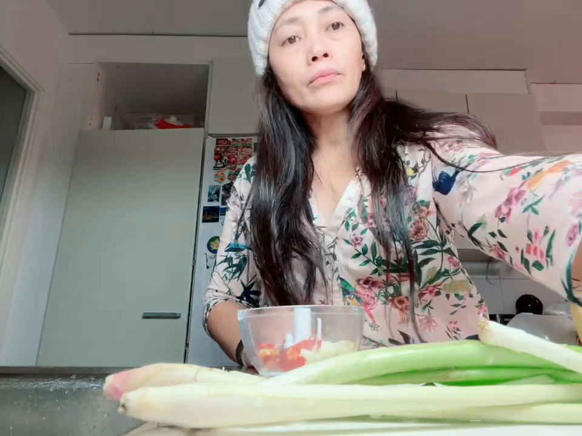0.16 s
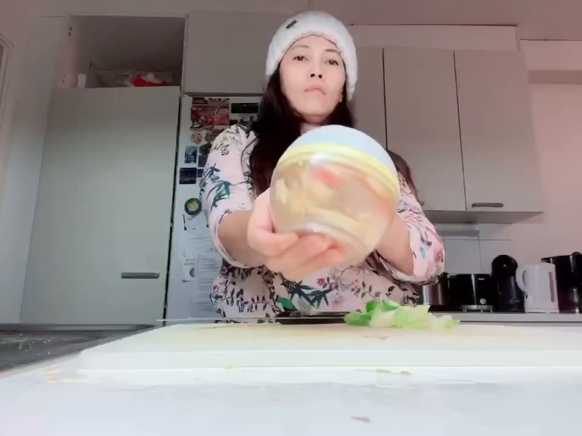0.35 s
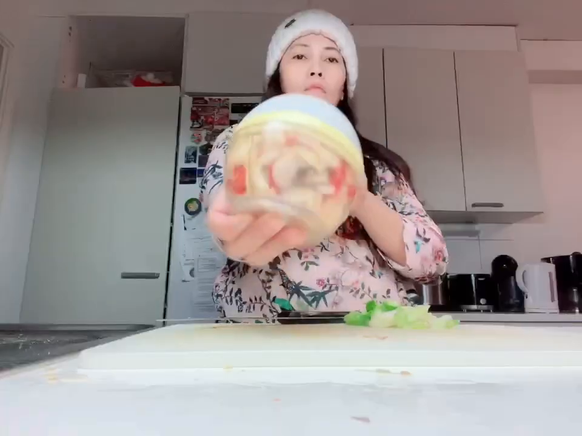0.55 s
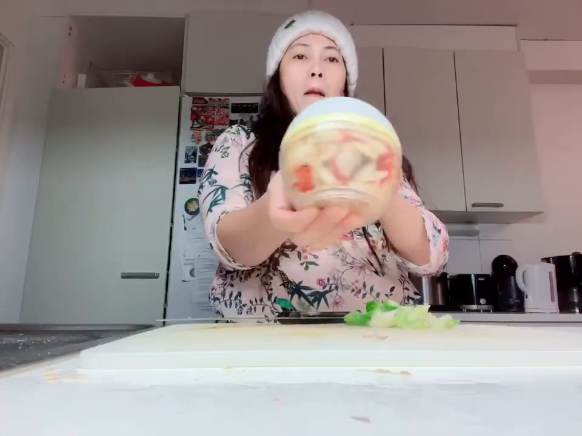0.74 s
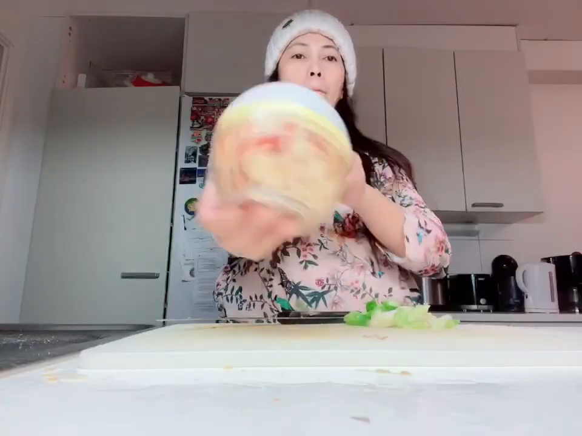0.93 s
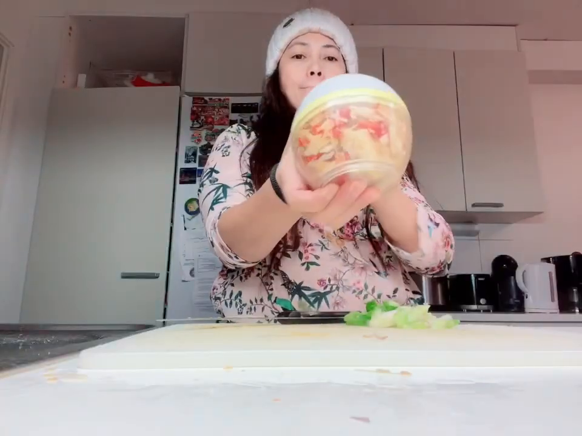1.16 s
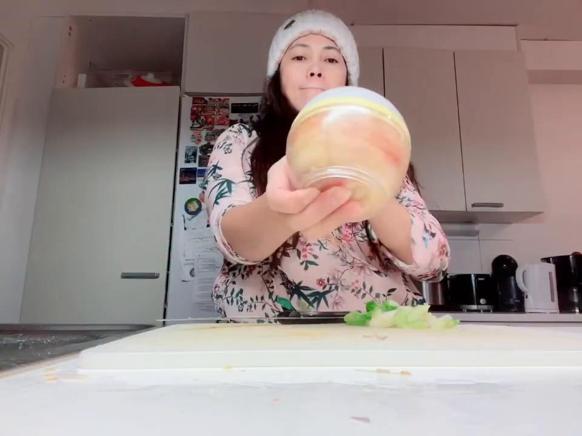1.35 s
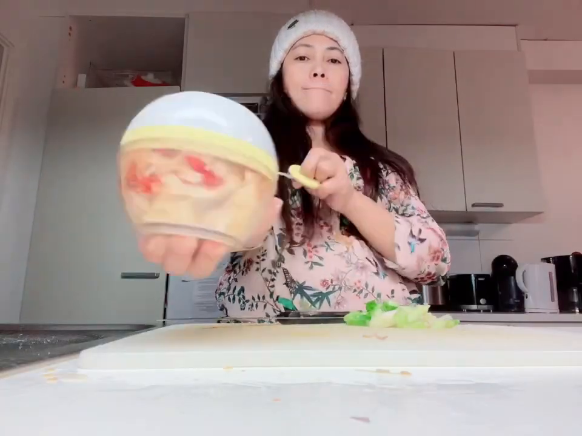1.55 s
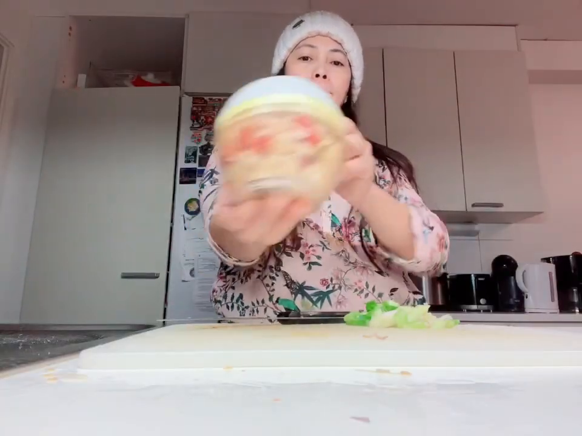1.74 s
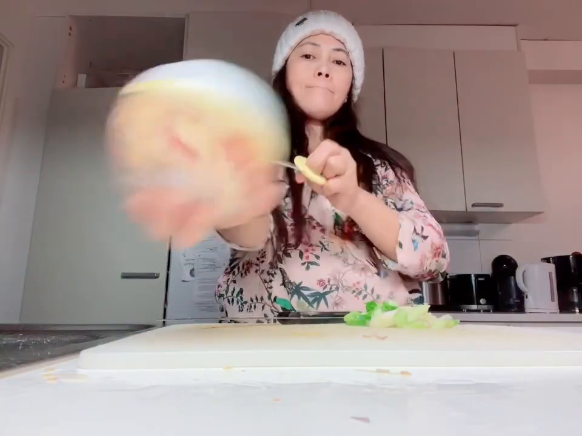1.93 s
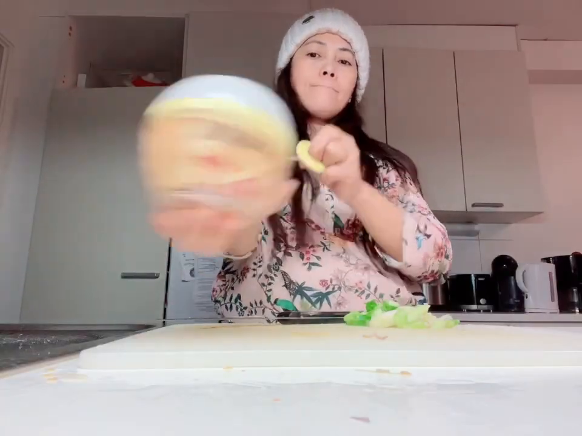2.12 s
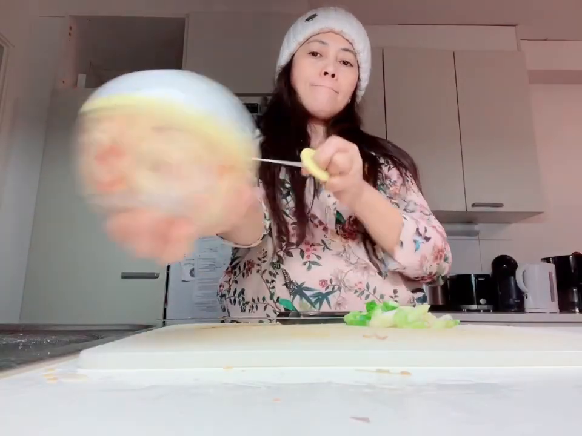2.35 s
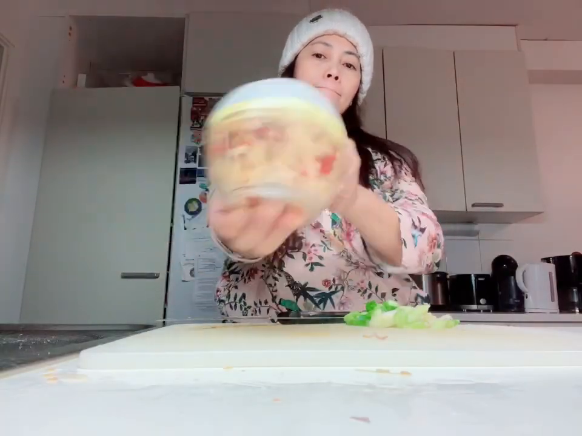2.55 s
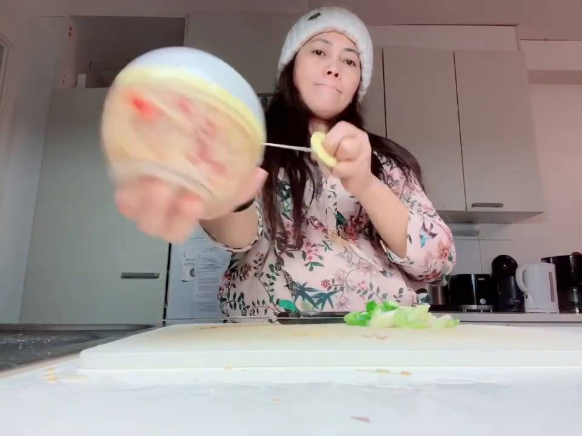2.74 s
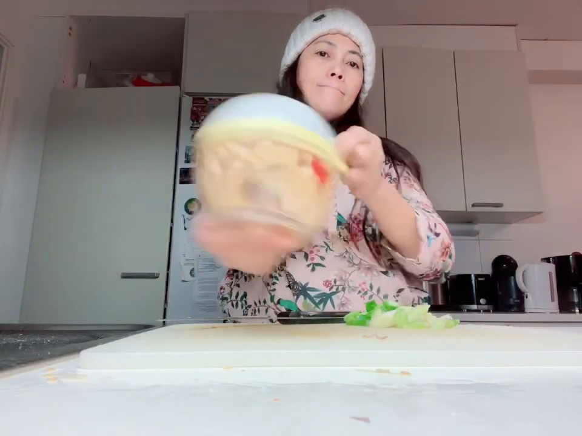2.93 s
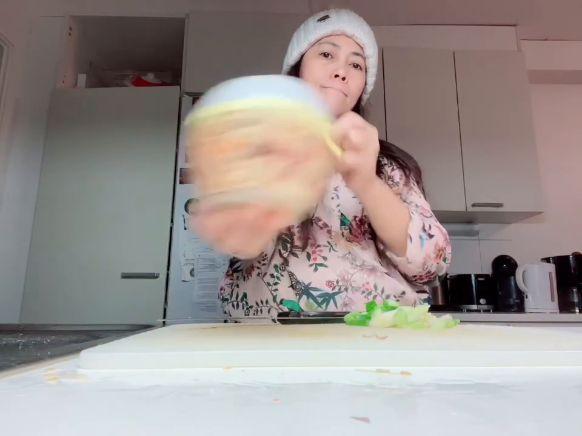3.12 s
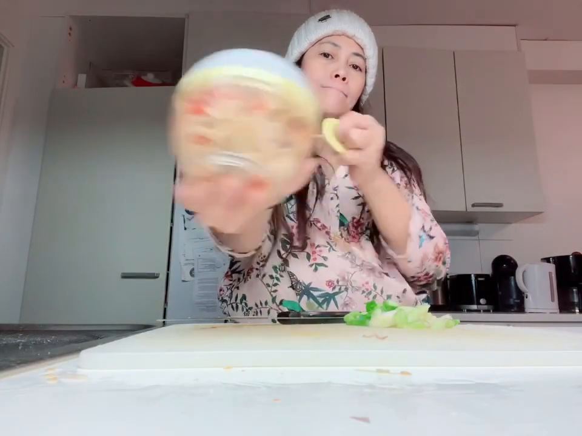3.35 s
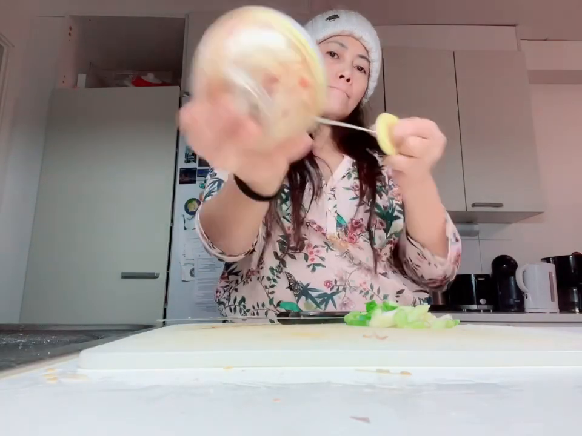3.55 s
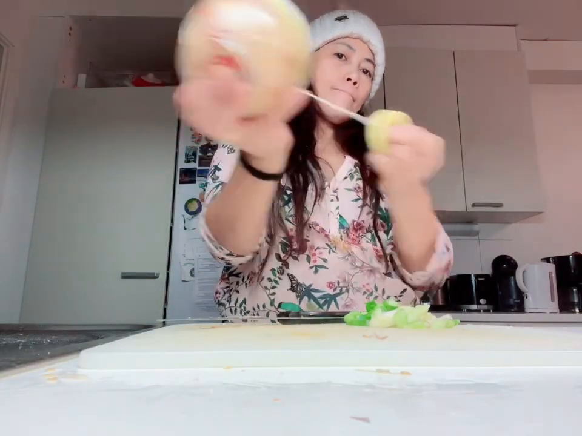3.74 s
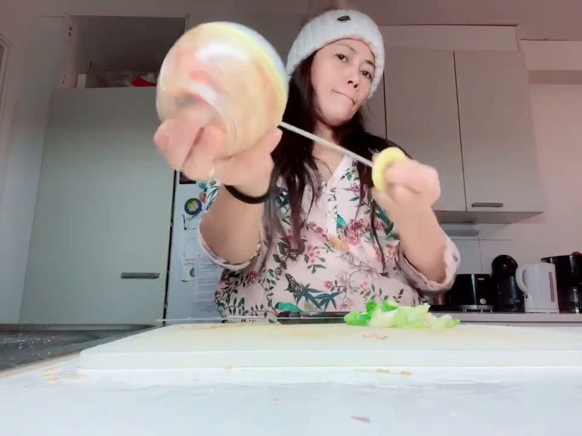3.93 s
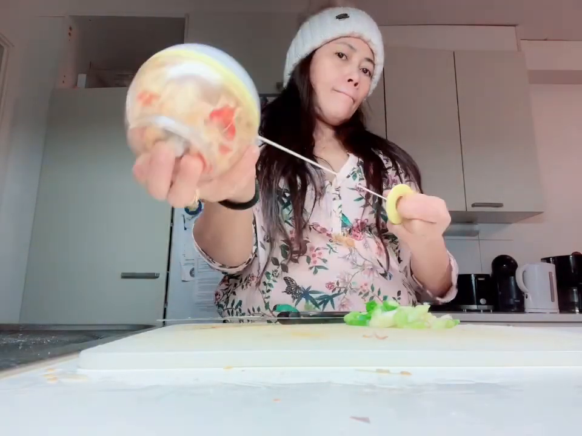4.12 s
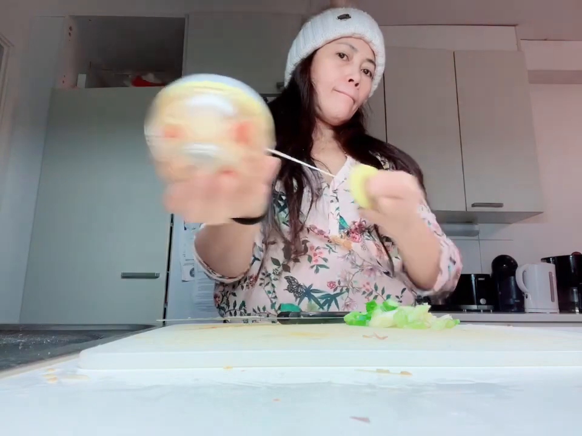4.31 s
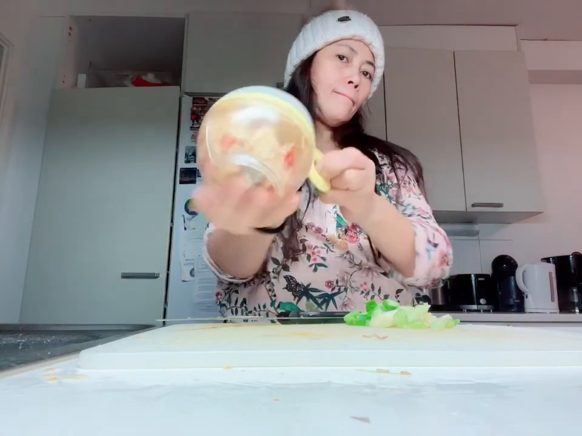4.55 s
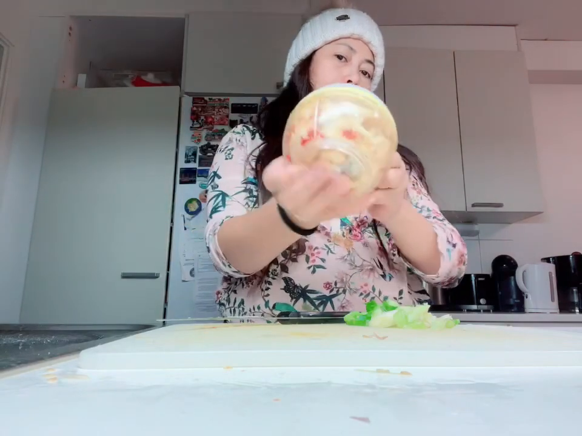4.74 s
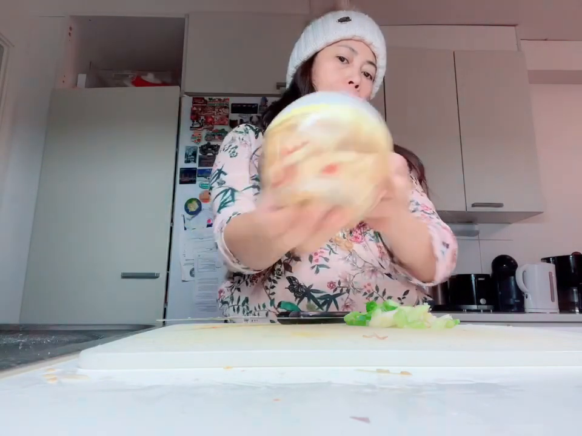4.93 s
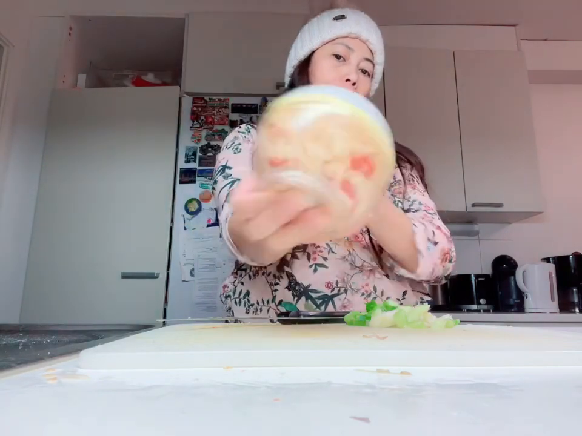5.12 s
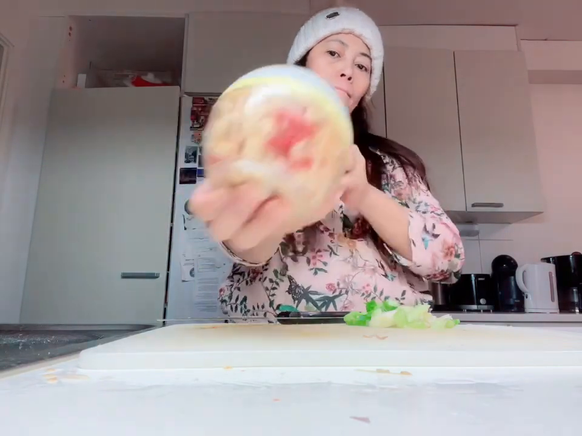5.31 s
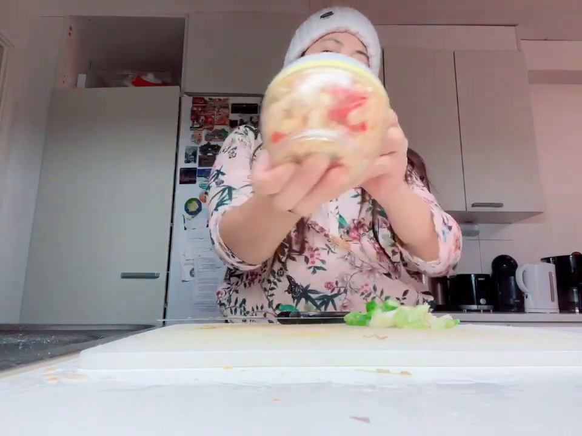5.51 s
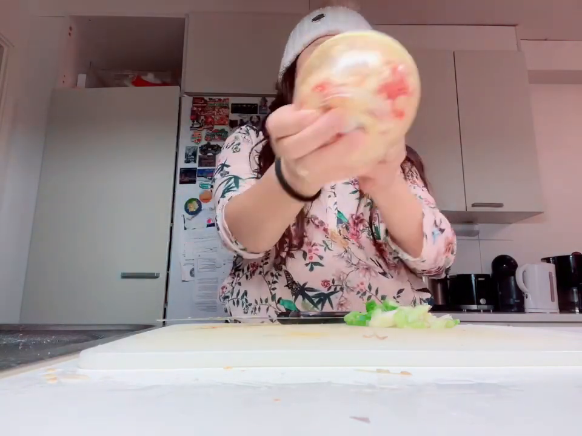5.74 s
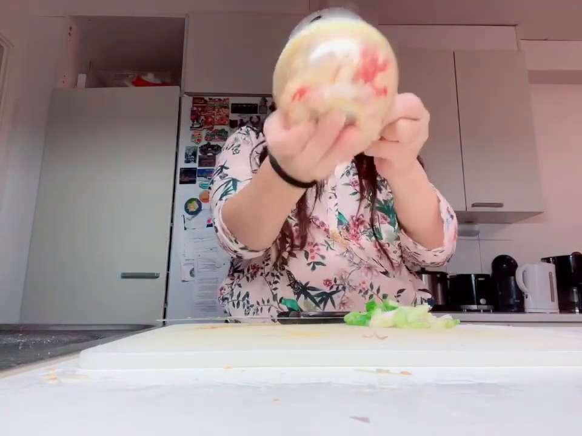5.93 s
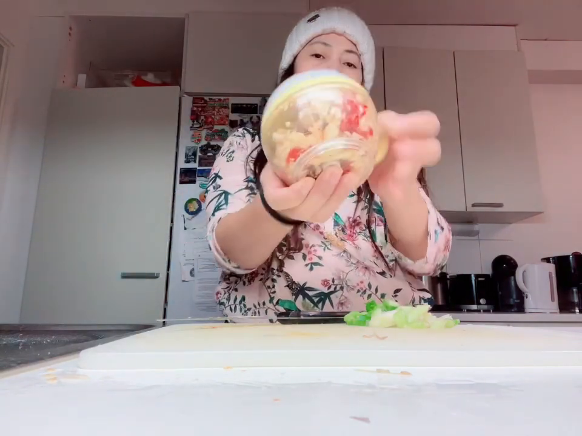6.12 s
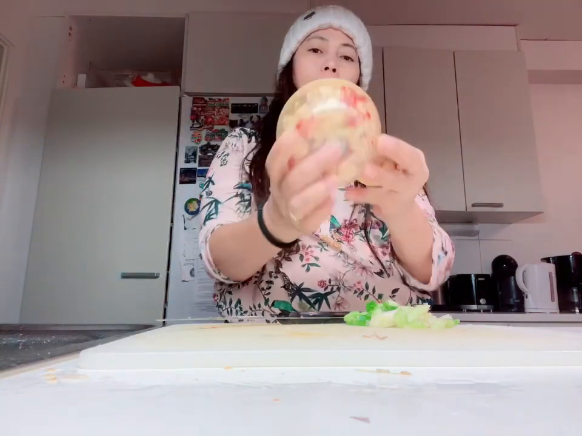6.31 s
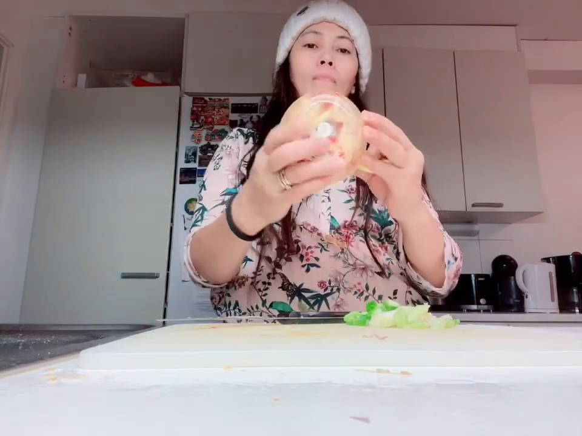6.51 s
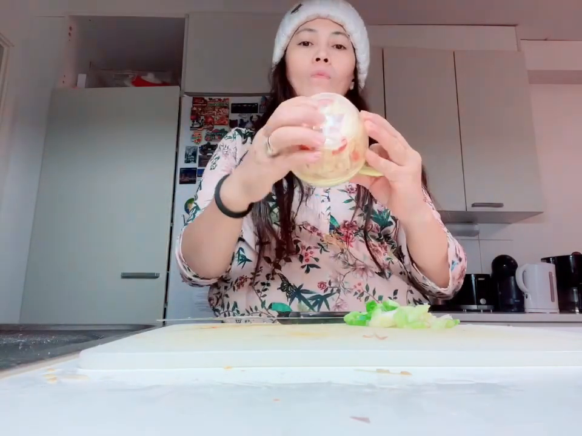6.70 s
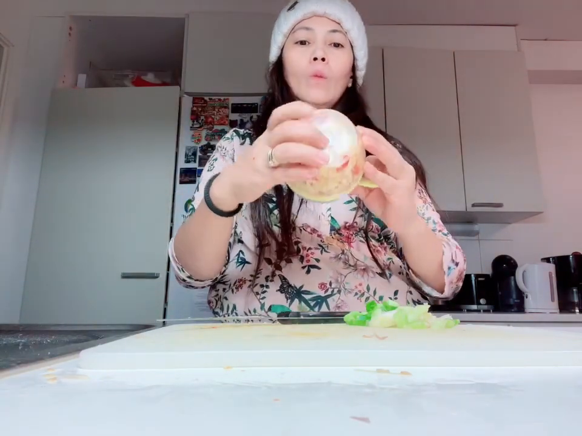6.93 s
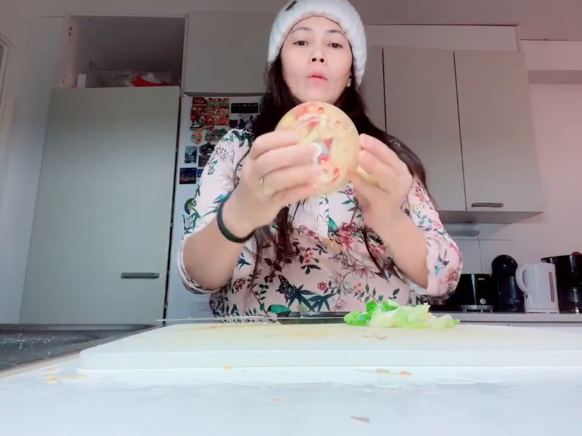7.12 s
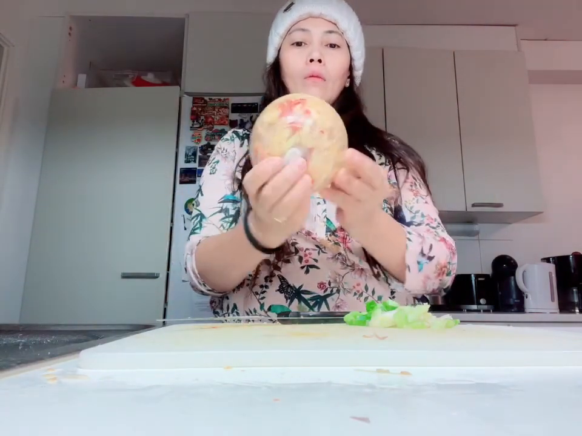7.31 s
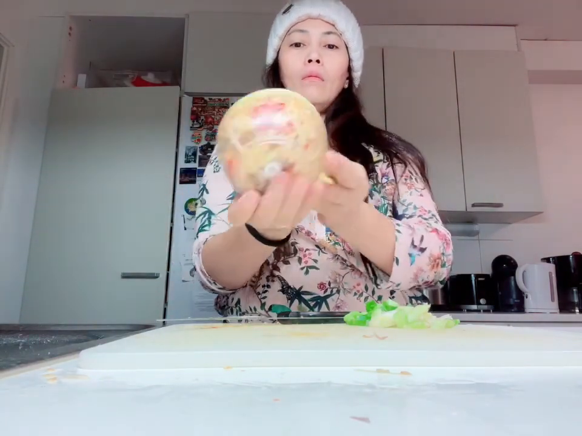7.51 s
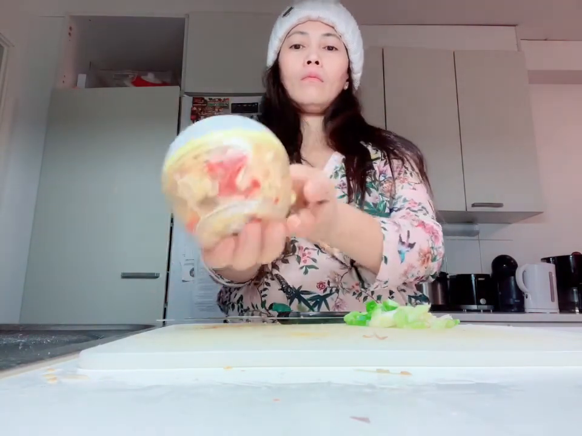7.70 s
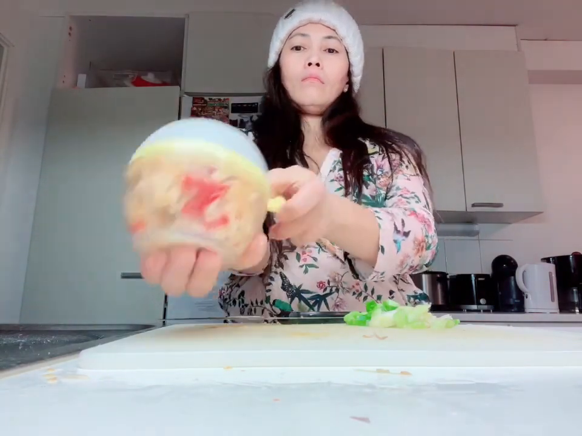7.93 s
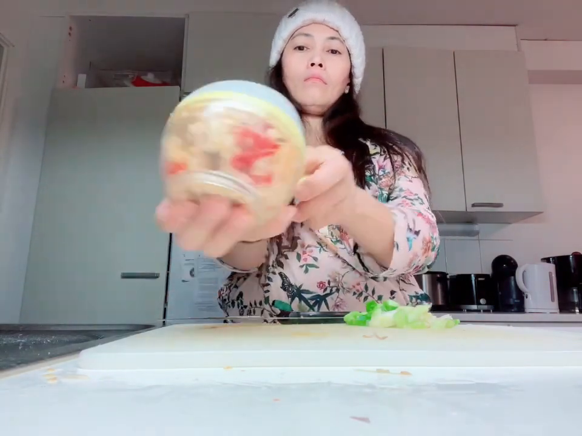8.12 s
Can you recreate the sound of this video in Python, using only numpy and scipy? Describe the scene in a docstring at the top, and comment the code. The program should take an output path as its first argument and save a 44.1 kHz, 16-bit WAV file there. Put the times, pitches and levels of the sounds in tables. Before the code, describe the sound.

A hand-pull food chopper clacks and rattles in quick repeated strokes, its cord zipping back each time, then slows to scattered hollow knocks.

```python
"""Kitchen counter: a hand-pull food chopper works close to a phone that has just been set down.
Each stroke: a clack as the drive catches, a rattling churn of blades and garlic in the plastic bowl,
then the zip and squeal of the cord as the spring reels it in. A few slow, knocking turns follow.
Behind it: dull bumps, finger rub, puffs of air on the microphone, room air and an appliance hum."""
import sys
import numpy as np
from scipy import signal
from scipy.fft import rfft, irfft
from scipy.io import wavfile
from scipy.ndimage import uniform_filter1d, map_coordinates

SR = 44100
rng = np.random.default_rng(int(sys.argv[2]) if len(sys.argv) > 2 else 0)


def to_wav(s):
    """Save 16-bit WAV."""
    ch = np.atleast_2d(s).T  # columns
    pcm = np.round(np.clip(ch, -1, 1) * 32767)  # PCM
    wavfile.write(sys.argv[1], SR, pcm.astype(np.int16))


N = 359856
TIME_S = np.arange(N) / SR

# appliance hum and whine: pitch_hz, level_db
HUM_TONES = [(50, -70), (100, -53), (118, -67.5), (165, -67.5), (232, -70.5), (2298, -82), (2573, -74),
             (2622, -77.5), (2966, -76)]
# start_s, swell_s, fade_s, level_db
AIR_PUFFS = [(0.0, .08, .2, -50), (5.495, 0.025, .2, -39), (5.83, .05, 0.45, -48), (7.14, 0.064, .1, -51)]
FINGER_RUBS = [(0.0, 0.15, 0.047, -50), (0.228, 0.068, 0.046, -26), (4.645, 0.019, 0.26, -35),
               (5.622, 0.0091, 0.039, -35), (5.692, 0.048, 0.19, -38), (5.98, 0.041, .33, -47.5),
               (7.97, 0.092, .04, -40)]
# blows: start_s, peak_db, treble_db, pitch_hz
BUMP_HITS = [(0.249, -26.5, -2, 294), (0.286, -11.5, 4, 797), (0.326, -12, 11, 886),
             (3.197, -21.5, -1, 284), (5.546, -30, 0, 250), (5.75, -23.5, -18, 255), (5.766, -21.5, 6, 290),
             (6.56, -41.5, -10, 180)]   # phone on counter, bowl in hand
DRIVE_CLACKS = [(0.6995, -21, 1, 883), (1.165, -24.5, 2.5, 940), (1.707, -15.5, -7.5, 2280),
                (2.128, -14.5, -3, 950), (2.478, -15, -2.5, 906), (2.792, -9.5, 2, 940.5),
                (3.081, -12.5, -7, 2160), (3.377, -8.5, -6, 2136), (4.437, -11.5, -4, 1652),
                (4.878, -14, -9.5, 858), (5.484, -25, 1, 2220), (5.491, -15.5, -11.5, 880)]   # hard plastic handle and drive
BOWL_KNOCKS = [(0.502, -40.5, 7, 493), (0.78, -27, -4, 600), (0.804, -14, 9, 830), (0.849, -30, 15, 677),
               (0.907, -28.5, -15, 530), (0.967, -39.5, -1, 695), (1.224, -25.5, 0, 710),
               (1.281, -41, 6, 759), (1.331, -20, 11, 720), (1.374, -12, 10, 538), (1.763, -22.5, 0, 780),
               (1.849, -13.5, -5, 546), (2.217, -10.5, 0, 490), (2.269, -12, 6, 718),
               (2.333, -25.5, -3, 696), (2.516, -15, 8, 857), (2.822, -15.5, 18, 640), (2.845, -9, 6, 668),
               (3.11, -18, -4, 769), (3.494, -19.5, -10, 830), (3.862, -17.5, -10, 800),
               (4.074, -40, 10, 700), (4.137, -40.5, 5, 735), (4.537, -33, -10, 830),
               (4.657, -31.5, -9, 464), (4.743, -34, 7, 810), (4.761, -31.5, 6, 493), (4.95, -24.5, 8, 664),
               (4.985, -25, 12, 750), (5.053, -11, 3, 820), (5.071, -9, -11, 630), (5.089, -7.5, 18, 870),
               (5.261, -28.5, -6, 670), (5.629, -38, 0, 830), (5.695, -34.5, 2, 626),
               (5.748, -24.5, -17, 770), (5.877, -36.5, 6, 530), (6.284, -34.5, -21, 795),
               (7.377, -35.5, 6.5, 787), (7.6, -44, -7.5, 804), (7.704, -33.5, 4, 790),
               (7.752, -26.5, 2, 810), (7.774, -33, 7, 760), (7.794, -29.5, -6, 716),
               (7.818, -34.5, -9, 740), (7.841, -28.5, -8, 795), (7.878, -27.5, -15, 614),
               (7.962, -24, 3.5, 752), (8.003, -39, 16, 507), (8.038, -33.5, -9, 705),
               (8.072, -26.5, -14, 520), (8.142, -31.5, 24, 840)]   # blades and pieces on the bowl
# cord running onto the reel: start_s, run_up_s, run_down_s, scrape_db, squeal_db
CORD_REWINDS = [(0.546, .04, 0.12, -32, -40), (0.999, 0.049, 0.1, -30.5, -37.5),
                (1.52, 0.078, 0.12, -23.5, -24.5), (1.979, 0.054, 0.12, -22, -33),
                (2.35, 0.053, 0.094, -20.5, -22.5), (2.671, 0.067, 0.061, -20, -21.5),
                (2.974, 0.051, 0.056, -15.5, -19), (3.271, .042, 0.058, -20, -23.5),
                (3.61, 0.0037, 0.026, -41, -48), (3.63, .05, 0.096, -22.5, -27),
                (4.168, 0.0055, 0.035, -46, -44), (4.2, 0.084, 0.15, -26, -29),
                (4.745, 0.074, 0.032, -44, -41.5), (5.311, 0.0275, 0.15, -24.5, -28),
                (5.835, .003, .035, -52.5, -61), (6.389, 0.0028, 0.041, -47.5, -55),
                (7.022, .003, 0.026, -49.5, -51)]
# cord pulls: start_s, run_up_s, hold_s, chop_db, thud_db, spray_db
CORD_PULLS = [(0.337, 0.043, 0.042, -35.5, -42.5, -46), (0.721, 0.058, 0.026, -24, -31.5, -36.5),
              (1.187, 0.18, 0.045, -18.5, -27.5, -33.5), (1.723, 0.055, 0.074, -18, -30, -31.5),
              (2.118, 0.055, .085, -20, -27.5, -30.5), (2.481, 0.036, .07, -20.5, -34.5, -32.5),
              (2.796, .03, 0.064, -17.5, -29, -29.5), (3.089, 0.028, 0.031, -15.5, -25.5, -32.5),
              (3.379, 0.014, .115, -26.5, -36, -34.5), (3.783, 0.024, 0.082, -25.5, -36, -36.5),
              (3.915, 0.032, 0.018, -26.5, -29.5, -33), (4.445, .008, 0.018, -32.5, -34, -41.5),
              (4.882, 0.007, 0.013, -32, -40.5, -37.5), (4.956, 0.12, 0.02, -19.5, -26, -29.5),
              (5.492, 0.029, .02, -38, -40.5, -42)]
# resonances: freq_hz, width_hz, level_db
BOWL_MODES = [(470, 200, -9), (700, 170, -3), (860, 150, -1), (1650, 160, -11), (2050, 130, -3),
              (2510, 180, -9), (3030, 200, -12), (3480, 160, -13), (4150, 260, -16)]
REEL_MODES = [(867, 140, -8), (2120, 260, -4), (2520, 160, -12), (5390, 280, -2), (6070, 250, -13),
              (8270, 280, -1), (8900, 600, -8), (9700, 250, -8), (11500, 400, -13)]
# broad colours as heard: freq_hz, density_db
AIR_SPECTRUM = [(25, -29.5), (50, -10.5), (80, -4), (150, -21), (300, -13), (600, -19), (840, -18.5),
                (1000, -24.5), (1900, -29.5), (2500, -26.5), (3800, -35), (6200, -36), (16000, -47.5)]
PUFF_SPECTRUM = [(20, -13), (50, 4), (90, -13), (200, -30), (600, -68)]
FINGER_SPECTRUM = [(24, -51), (40, -17), (85, 3), (307, 8), (559, -4.5), (780, 0.5), (1240, -11.5),
                   (2420, -19.5), (4500, -38), (8000, -34), (10400, -56.5), (17600, -120)]
BUMP_SPECTRUM = [(29, -49), (50, -22), (97, 7), (154, -7.5), (238, 8.5), (637, -0.5), (784, -1.5),
                 (1160, -20.5), (1360, -11.5), (2010, -40), (7250, -42.5), (12000, -55), (15600, -94),
                 (22000, -120)]
CLACK_SPECTRUM = [(100, -36.5), (350, 1.5), (750, 6), (1200, -1), (2300, 3.5), (4000, -7.5), (8500, -3.5),
                  (12000, -13.5), (16000, -19)]
KNOCK_SPECTRUM = [(80, -38), (250, 8), (750, 7), (1150, 0.5), (2300, 1.5), (4500, -12.5), (9000, -16.5),
                  (16000, -39)]
CHOP_SPECTRUM = [(150, -11.5), (350, 1.5), (600, 0.5), (900, 4.5), (1100, -3.5), (1800, -3.5), (2300, -2.5),
                 (4000, -14.5), (7000, -14.5), (16000, -28)]
THUD_SPECTRUM = [(25, -25), (55, -1.5), (110, -12.5), (170, -3), (270, 8.5), (450, -2), (800, -18.5),
                 (2000, -42.5)]
SPRAY_SPECTRUM = [(1000, -11), (3000, -3.5), (5000, -3), (7000, 1), (9000, 1.5), (11000, -6), (16000, -6.5)]
# cord's scraping hiss as heard, with audio-coder dips near 10.4 and 13.7 kHz: freq_hz, density_db
HEARD_SCRAPE_SPECTRUM = [(80, -34), (250, 5), (700, 1.5), (1300, -11), (2600, 2.5), (4300, -6), (7700, 2.5),
                         (9800, 1), (10400, -11), (12500, -9.5), (13700, -30.5), (16000, -31.5)]
# microphone notches: freq_hz, width_hz, gain_db
MIC_NOTCHES = [(1005, 66, -7.5), (1790, 43, -10)]

# levels at the ends of a move, relative to its top
RUB_START_DB, RUB_STOP_DB = -6, -17.5
REEL_START_DB, REEL_STOP_DB = -9.5, -18.5


def from_db(db):
    """Decibels to gain."""
    return 10 ** (np.asarray(db) / 20)


def unit_rms(x):
    """Scale to unit rms."""
    return x / np.sqrt(np.mean(x ** 2) + 1e-20)


def drift(rate_hz):
    """Smooth random wander, unit rms."""
    pole = np.exp(-2 * np.pi * rate_hz / SR)
    return unit_rms(signal.lfilter([1], [1, -2 * pole, pole * pole], rng.standard_normal(N + SR))[SR:])


def gate(t, fade_s=0.0078):
    """Ramp that opens as t passes zero."""
    return np.clip(t / fade_s, 0, 1)


def swells(rows, start_db, stop_db, curve, fade_s):
    """Each move rises to its top and sinks; one gain curve per level column."""
    out = np.zeros((len(rows[0]) - 3, N))
    for start_s, up_s, down_s, *levels_db in rows:
        length_s = up_s + down_s + fade_s
        span = slice(*np.searchsorted(TIME_S, [start_s, start_s + length_s]))
        t = TIME_S[span] - start_s
        rise_db = start_db * np.clip(1 - t / up_s, 0, 1) ** curve
        fall_db = stop_db * np.clip((t - up_s) / down_s, 0, 1) ** curve
        envelope = from_db(rise_db + fall_db) * gate(t) * gate(length_s - t, fade_s)
        out[:, span] += np.outer(from_db(levels_db), envelope)
    return out


def response(spectrum, modes=(), modes_db=0, size=4096):
    """Impulse response: minimum-phase spectrum plus ringing modes, unit energy."""
    hz, db = np.transpose(spectrum)
    bins_hz = np.maximum(np.fft.rfftfreq(size, 1 / SR), 1)
    magnitude = from_db(np.interp(np.log(bins_hz), np.log(hz), db))
    cepstrum = irfft(np.log(magnitude))
    cepstrum[1:size // 2] *= 2
    out = irfft(np.exp(rfft(cepstrum[:size // 2], size)))
    t = TIME_S[:size]
    for mode_hz, width_hz, level_db in modes:
        gain = from_db(level_db + modes_db) * 2 * np.pi * width_hz / SR
        out += gain * np.exp(-np.pi * width_hz * t) * np.cos(2 * np.pi * mode_hz * t)
    return out / np.linalg.norm(out)


def excite(force, body):
    """Drive a body with a force."""
    return signal.oaconvolve(force, body)[:N]


def contacts(per_s, spread_db, contact_s, rub):
    """Tiny random impacts of uneven size over steady rubbing, evened to unit level."""
    onsets = rng.random(N) < per_s / SR
    energies = onsets * from_db(spread_db * np.minimum(rng.exponential(1, N), 3)) ** 2
    power = signal.lfilter([1], [1, -np.exp(-1 / (contact_s * SR))], energies + 1e-18)
    power = power / power.mean() + rub
    return rng.standard_normal(N) * np.sqrt(power / uniform_filter1d(power, size=1500))


def plop(start_hz, ring_s, sag, sag_s=.014, size=4096):
    """Short ring, falling in pitch as the struck wall gives way; unit energy."""
    t = TIME_S[:size]
    pitch_hz = start_hz * np.exp(-sag * (1 - np.exp(-t / sag_s)))
    ring = np.sin(2 * np.pi * np.cumsum(pitch_hz) / SR) * np.exp(-t / ring_s)
    return ring / np.linalg.norm(ring)


def blows(rows, spectrum, modes=(), modes_db=0, *, rise_s, contact_s, chatter_db, chatter_s,
          plop_db, ring_s, sag, treble_hz=3000, size=4096):
    """Contact burst, dying chatter and a plop; mode strengths vary with where each blow lands."""
    out, t = np.zeros(N + SR), TIME_S[:size]
    attack = 1 - np.exp(-(t / rise_s) ** 2)
    decay = np.exp(-t / contact_s) + from_db(chatter_db) * np.exp(-t / chatter_s)
    for start_s, peak_db, treble_db, pitch_hz in rows:
        struck_modes = [(hz, width_hz, db + rng.normal(0, 4)) for hz, width_hz, db in modes]
        force = rng.standard_normal(size) * attack * decay
        hit = signal.fftconvolve(force, response(spectrum, struck_modes, modes_db))[:size]
        low = signal.sosfilt(signal.butter(1, treble_hz, fs=SR, output="sos"), hit)
        hit = low + (hit - low) * from_db(treble_db)
        note = np.r_[np.zeros(int(rise_s * SR)), plop(pitch_hz, ring_s, sag)][:size]
        hit = hit / np.linalg.norm(hit) + from_db(plop_db) * note
        peak_rms = np.sqrt(uniform_filter1d(hit ** 2, size=128).max())
        at = round(start_s * SR)
        out[at:at + size] += hit * from_db(peak_db) / peak_rms
    return out[:N]


def background(waver_db=1.2, air_db=-57.5):
    """Wavering appliance hum and room air."""
    hum = sum(from_db(db) * np.sqrt(2) * np.sin(2 * np.pi * (hz * TIME_S + rng.random()))
              for hz, db in HUM_TONES)
    hum *= from_db(waver_db * drift(rate_hz=3))
    return hum + from_db(air_db) * excite(rng.standard_normal(N), response(AIR_SPECTRUM))


def kitchen(direct, wet_db=-16, t60_s=0.22, build_s=0.001, wall_hz=7000):
    """Dense, dulled reflections off cupboards and tiles."""
    t = TIME_S[:SR // 2]
    tail = rng.standard_normal(len(t)) * from_db(-60 * t / t60_s) * (1 - np.exp(-t / build_s))
    tail = signal.sosfilt(signal.butter(1, wall_hz, fs=SR, output="sos"), tail)
    return direct + from_db(wet_db) * excite(direct, tail / np.linalg.norm(tail))


def swinging_echo(direct, lag_s=0.001292, swing=.2, echo_db=-7):
    """Near reflection; its delay shifts as the bowl swings."""
    lag_samples = lag_s * SR * (1 + swing * drift(rate_hz=1.3))
    return direct + from_db(echo_db) * map_coordinates(direct, [np.arange(N) - lag_samples], order=1)


def puffs():
    """Air stirred by arms and bowl rumbles on the microphone."""
    flow, = swells(AIR_PUFFS, RUB_START_DB, RUB_STOP_DB, curve=1, fade_s=.015)
    return flow * excite(rng.standard_normal(N), response(PUFF_SPECTRUM))


def hands():
    """Soft bumps; fingers rub on phone and bowl."""
    bumps = blows(BUMP_HITS, BUMP_SPECTRUM, rise_s=0.0027, contact_s=0.0055,
                  chatter_db=-17.5, chatter_s=.012, plop_db=-1, ring_s=0.0046, sag=0.069)
    friction = contacts(per_s=97, spread_db=5.5, contact_s=0.0035, rub=0.23)
    pressure, = swells(FINGER_RUBS, RUB_START_DB, RUB_STOP_DB, curve=1.93, fade_s=0.014)
    return bumps + pressure * excite(friction, response(FINGER_SPECTRUM))


def clacks():
    """The drive catches and rings the bowl."""
    return blows(DRIVE_CLACKS, CLACK_SPECTRUM, BOWL_MODES, modes_db=-1.5, rise_s=0.004, contact_s=.004,
                 chatter_db=-28.5, chatter_s=0.023, plop_db=-4, ring_s=0.006, sag=0.099)


def knocks():
    """Single pieces hit the bowl with a hollow, falling plop."""
    return blows(BOWL_KNOCKS, KNOCK_SPECTRUM, BOWL_MODES, modes_db=-6.5, rise_s=.0015, contact_s=.0028,
                 chatter_db=-18.5, chatter_s=0.032, plop_db=-2, ring_s=.009, sag=.6)


def cord(squeal_hz=2176, sag=0.076, flutter_db=4.1):
    """The cord scrapes through its eyelet; the reel squeals, flatter at low speed."""
    scrape_gain, _ = swells(CORD_REWINDS, REEL_START_DB, REEL_STOP_DB, curve=1.46, fade_s=.006)
    _, squeal_gain = swells(CORD_REWINDS, start_db=-8, stop_db=-13, curve=1.7, fade_s=0.0044)
    unit_moves = [(*row[:3], 0) for row in CORD_REWINDS]
    speed, = swells(unit_moves, REEL_START_DB, REEL_STOP_DB, curve=1.8, fade_s=0.0073)
    slips = contacts(per_s=1600, spread_db=8.5, contact_s=0.005, rub=0.78)
    scrape = excite(slips, response(HEARD_SCRAPE_SPECTRUM, REEL_MODES, modes_db=13.5))
    wobble = .012 * drift(rate_hz=9) + .03 * drift(rate_hz=130)
    pitch_hz = squeal_hz * (1 + wobble - sag * (1 - speed))
    flutter = unit_rms(from_db(flutter_db * drift(rate_hz=430)))
    squeal = flutter * np.sin(2 * np.pi * np.cumsum(pitch_hz) / SR)
    return scrape_gain * scrape + squeal_gain * squeal


def tumbling(per_s, low_hz, high_hz, sizes=10):
    """Loose pieces of many sizes plop against the wall at random."""
    out = 0
    for hz in np.geomspace(low_hz, high_hz, sizes):
        landings = (rng.random(N) < per_s / sizes / SR) * rng.standard_normal(N)
        out = out + excite(landings, plop(hz, ring_s=.008, sag=.9))
    return unit_rms(out)


def spin_db(t, run_up_s, hold_s, slack_db=-23, brake_db_per_s=246, coast_db=-16, coast_db_per_s=68):
    """Blade vigour in one pull: run up from slack, hold, brake in the food, coast faintly."""
    rise_db = slack_db * np.clip(1 - t / run_up_s, 0, 1)
    free_s = np.maximum(t - run_up_s - hold_s, 0)
    return rise_db + np.maximum(-brake_db_per_s * free_s, coast_db - coast_db_per_s * free_s)


def stroke_gains(thud_db_per_db=.85, spray_db_per_db=1.03):
    """Chop, thud and spray follow the spin; heavy pieces tumble on, spray dies sooner."""
    out, t = np.zeros((3, N + SR)), TIME_S[:SR]
    for start_s, run_up_s, hold_s, *levels_db in CORD_PULLS:
        follow_db = np.outer([1, thud_db_per_db, spray_db_per_db], spin_db(t, run_up_s, hold_s))
        at = round(start_s * SR)
        out[:, at:at + SR] += gate(t) * from_db(np.array(levels_db)[:, None] + follow_db)
    return out[:, :N]


def blades(tumble_db=-2.5):
    """Blades fling food at the wall: cuts ring the bowl, big pieces thud, wet bits patter."""
    chop_gain, thud_gain, spray_gain = stroke_gains()
    cuts = contacts(per_s=380, spread_db=3.4, contact_s=.0022, rub=.25)
    chop = excite(cuts, response(CHOP_SPECTRUM, BOWL_MODES, modes_db=0.5))
    lumps = contacts(per_s=130, spread_db=-0.5, contact_s=0.0013, rub=0.068)
    pieces = tumbling(per_s=240, low_hz=240, high_hz=973)
    thud = unit_rms(excite(lumps, response(THUD_SPECTRUM)) + from_db(tumble_db) * pieces)
    bits = contacts(per_s=900, spread_db=-4.5, contact_s=0.00089, rub=0.78)
    spray = excite(bits, response(SPRAY_SPECTRUM))
    return chop_gain * chop + thud_gain * thud + spray_gain * spray


def scene():
    """Chopper in the kitchen, mono."""
    chopper = swinging_echo(blades() + cord() + clacks() + knocks())
    return (kitchen(chopper) + hands() + puffs() + background())[None]


def record(dry):
    """Phone: bass cut, two notches, rounded peaks, top cut; brief silence after the opening bumps."""
    low_cut_hz, high_cut_hz = 38, 15850
    mute_from_s, mute_to_s = 0.337, 0.356
    heard = signal.sosfilt(signal.butter(2, low_cut_hz, "high", fs=SR, output="sos"), dry)
    for hz, width_hz, gain_db in MIC_NOTCHES:
        band = signal.lfilter(*signal.iirpeak(hz, hz / width_hz, fs=SR), heard)
        heard = heard + (from_db(gain_db) - 1) * band
    live = uniform_filter1d(1. * ((TIME_S < mute_from_s) | (TIME_S > mute_to_s)), size=64)
    rounded = np.tanh(heard * live)
    return signal.sosfilt(signal.ellip(10, .1, 80, high_cut_hz, fs=SR, output="sos"), rounded)


dry = scene()
out = record(dry)
to_wav(out)
```